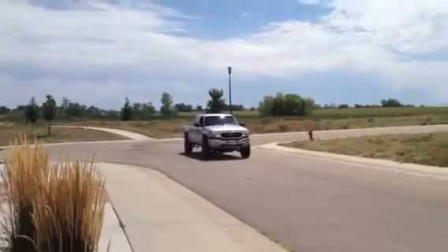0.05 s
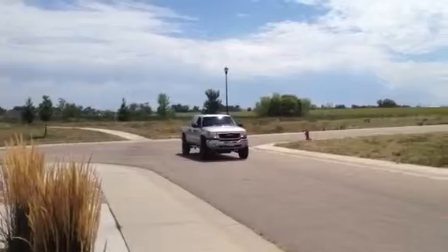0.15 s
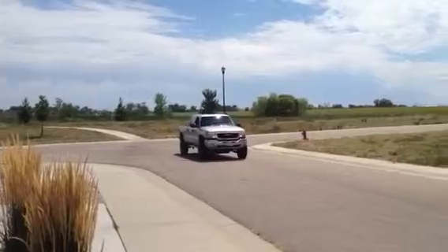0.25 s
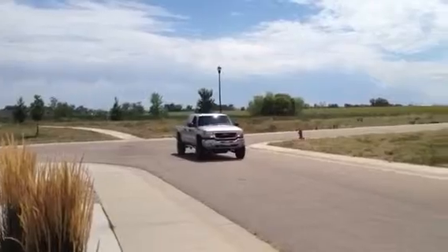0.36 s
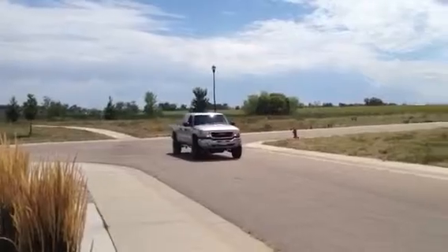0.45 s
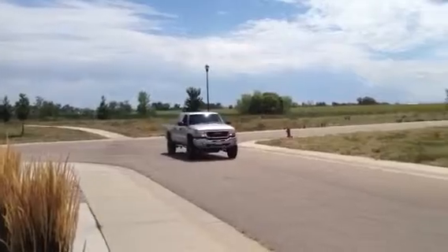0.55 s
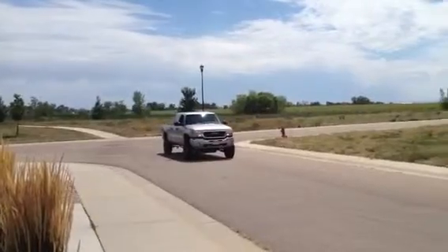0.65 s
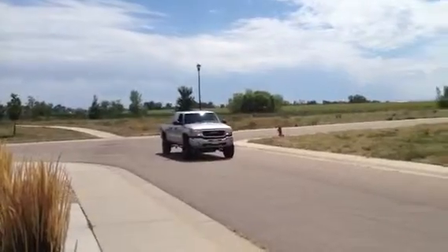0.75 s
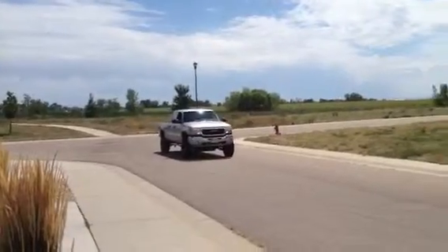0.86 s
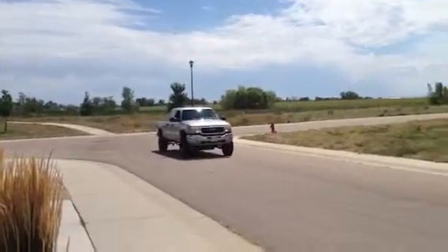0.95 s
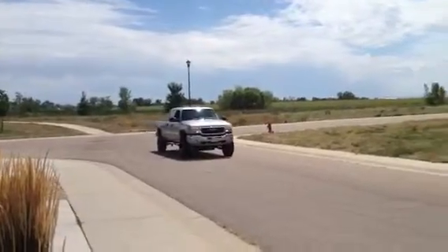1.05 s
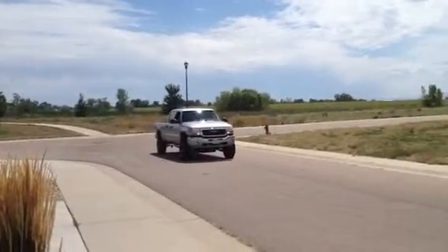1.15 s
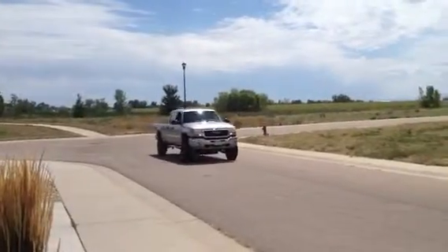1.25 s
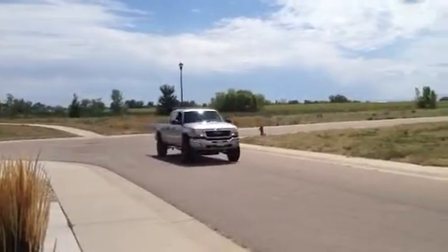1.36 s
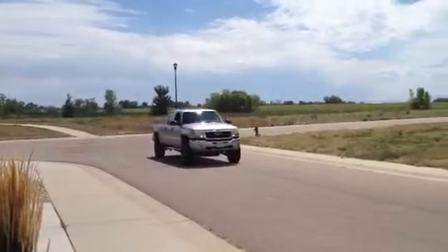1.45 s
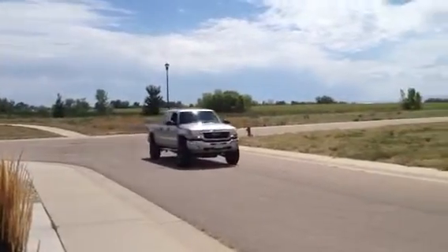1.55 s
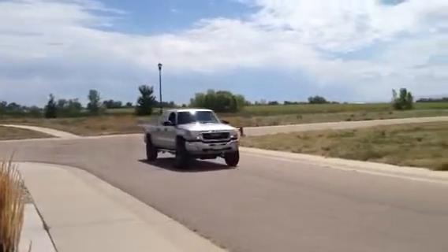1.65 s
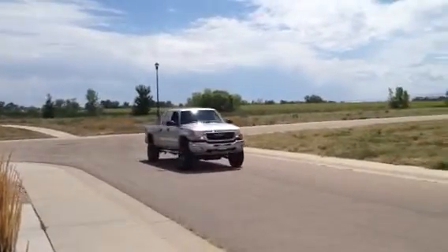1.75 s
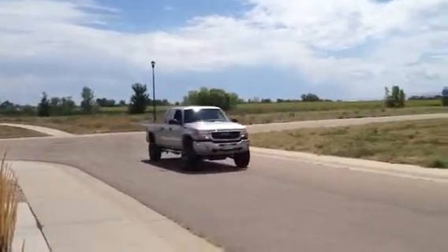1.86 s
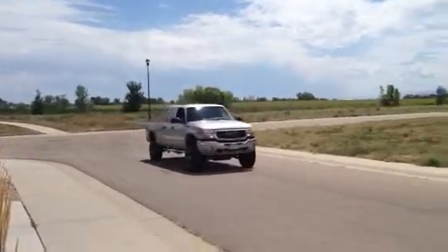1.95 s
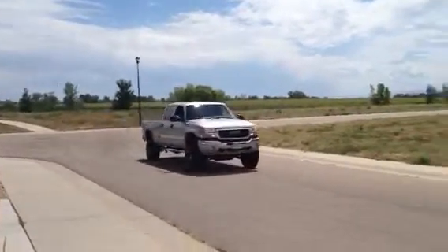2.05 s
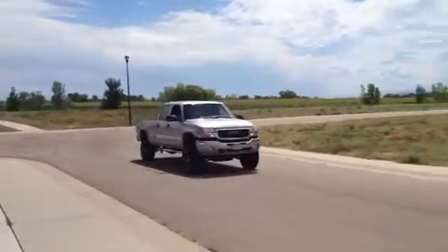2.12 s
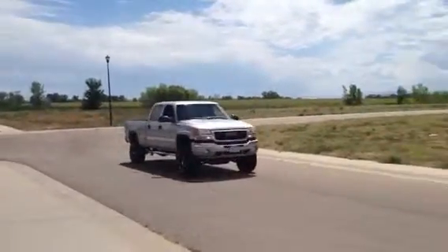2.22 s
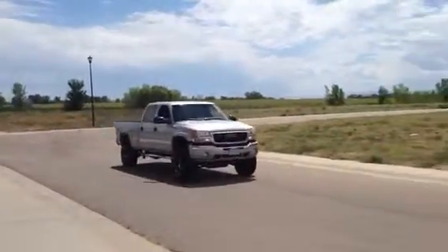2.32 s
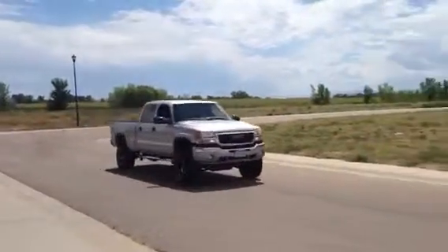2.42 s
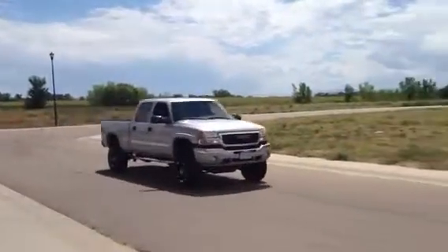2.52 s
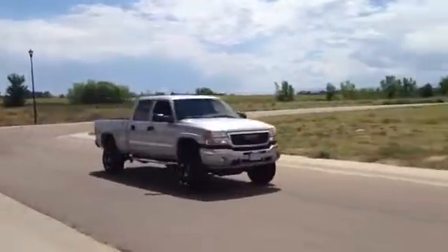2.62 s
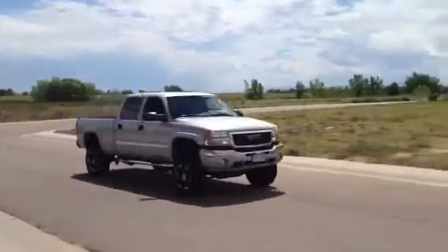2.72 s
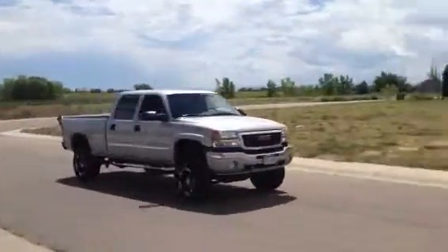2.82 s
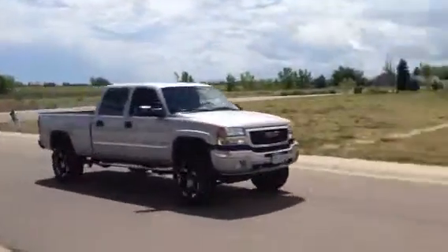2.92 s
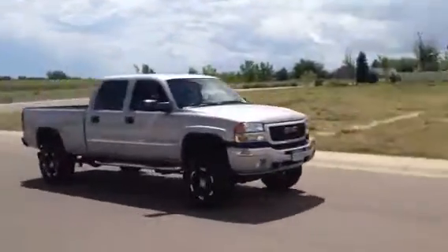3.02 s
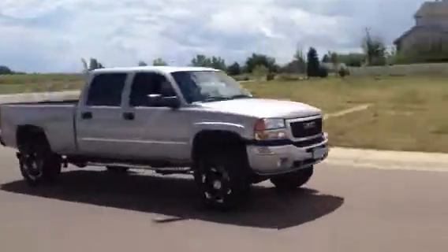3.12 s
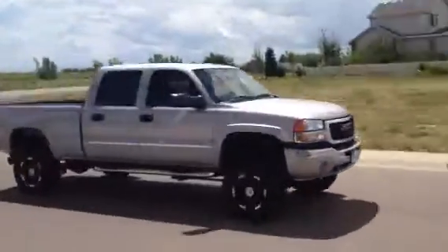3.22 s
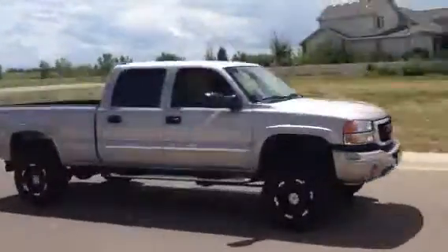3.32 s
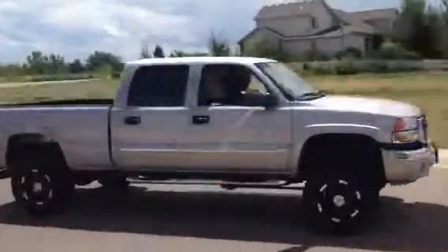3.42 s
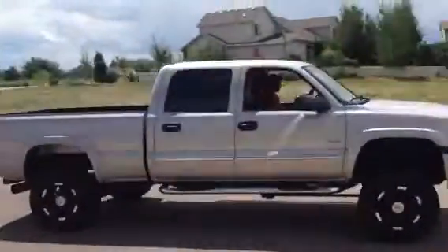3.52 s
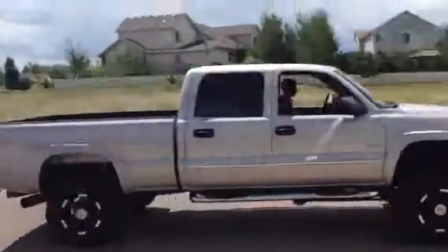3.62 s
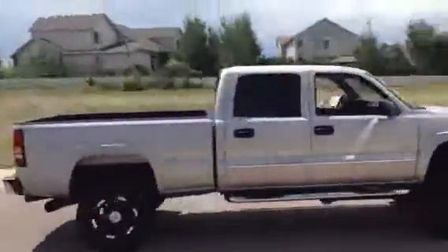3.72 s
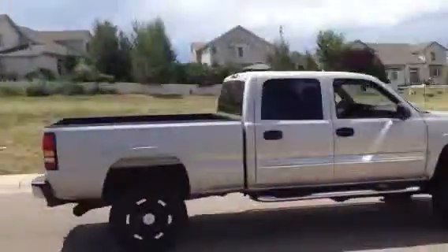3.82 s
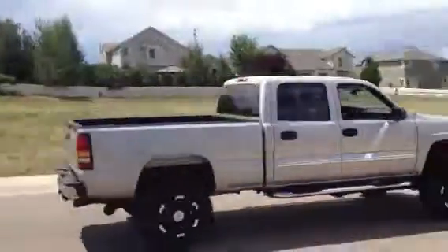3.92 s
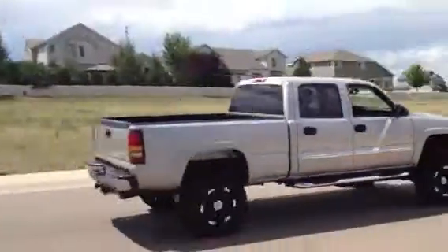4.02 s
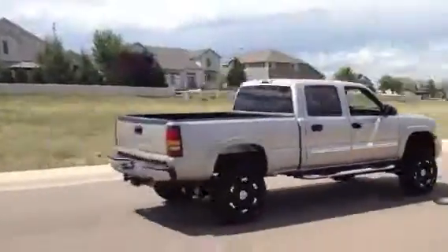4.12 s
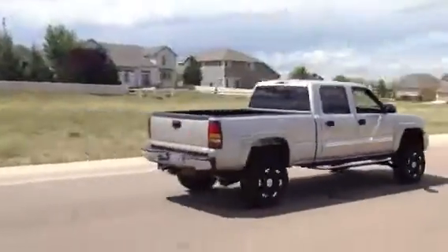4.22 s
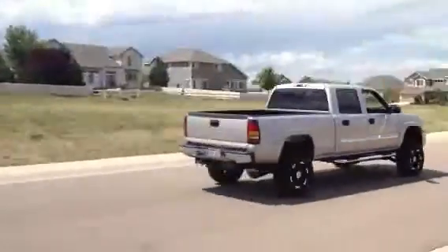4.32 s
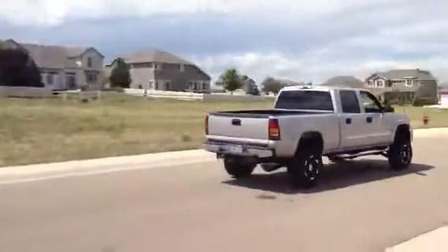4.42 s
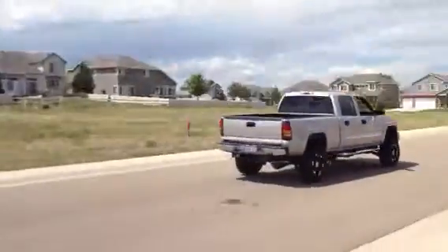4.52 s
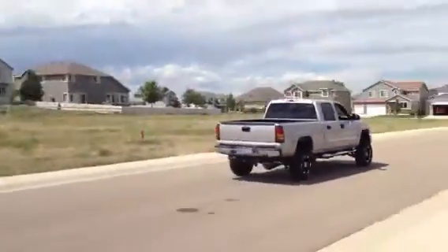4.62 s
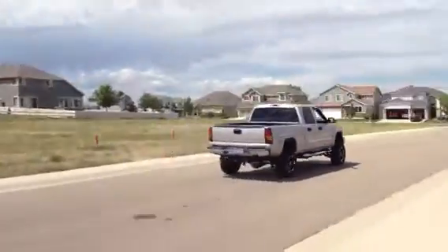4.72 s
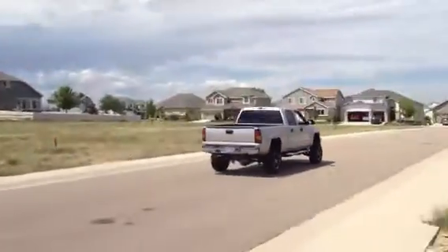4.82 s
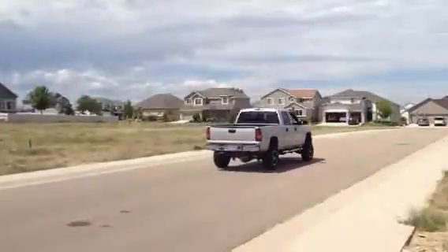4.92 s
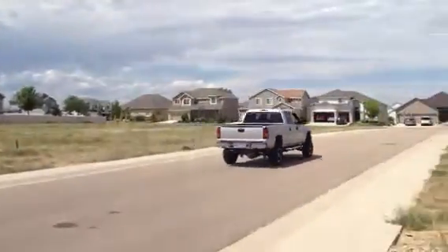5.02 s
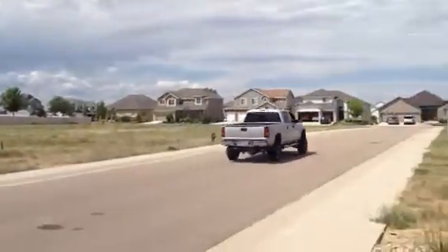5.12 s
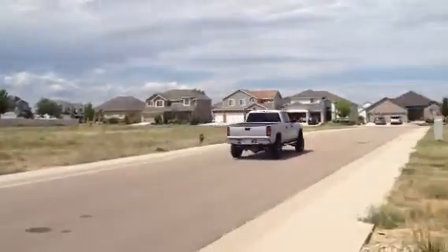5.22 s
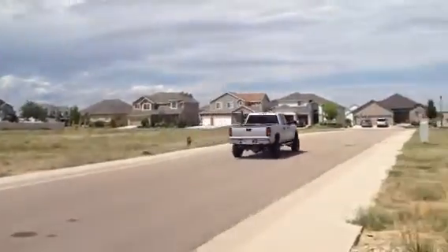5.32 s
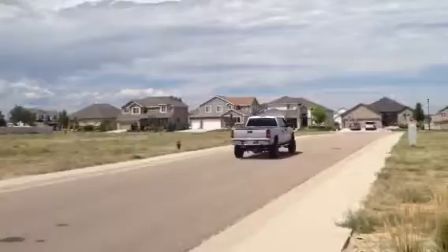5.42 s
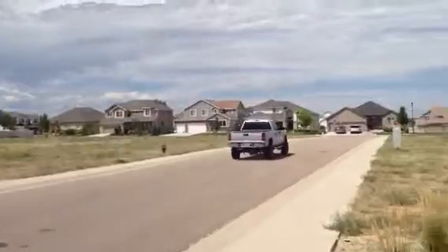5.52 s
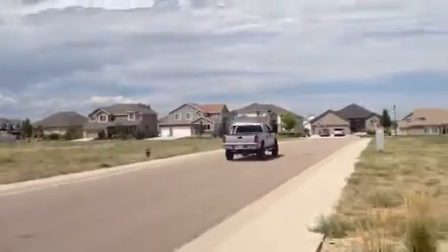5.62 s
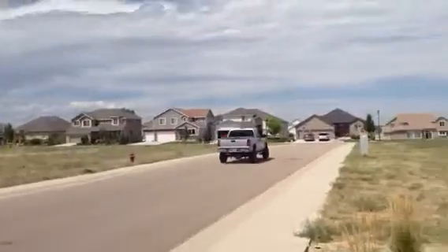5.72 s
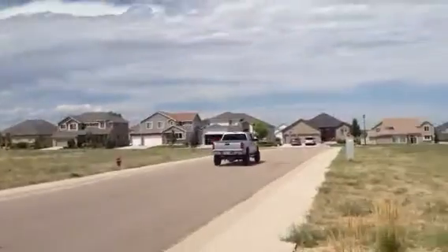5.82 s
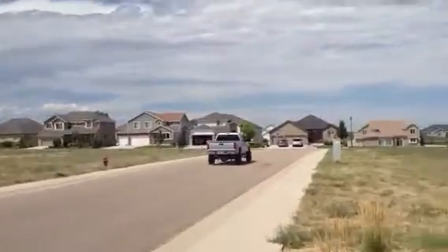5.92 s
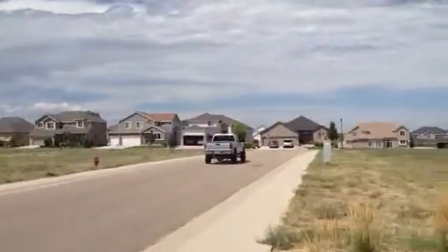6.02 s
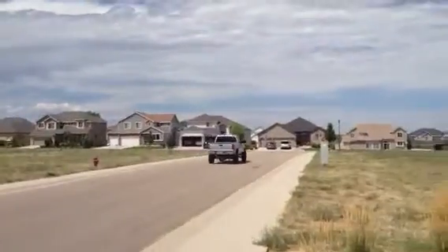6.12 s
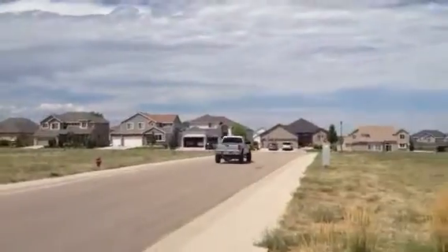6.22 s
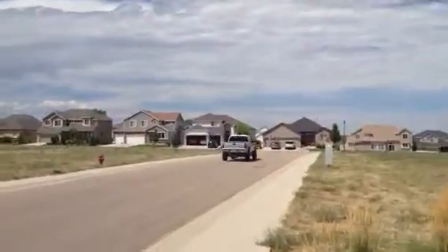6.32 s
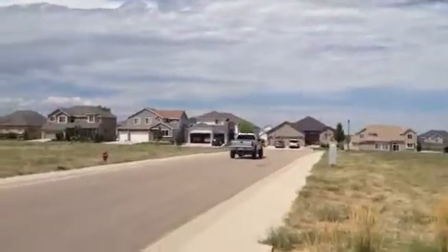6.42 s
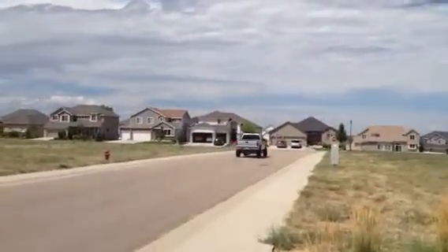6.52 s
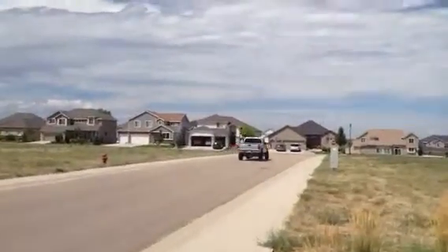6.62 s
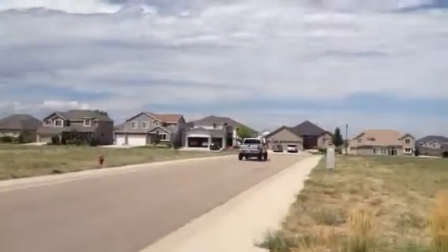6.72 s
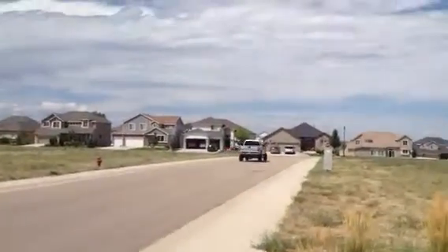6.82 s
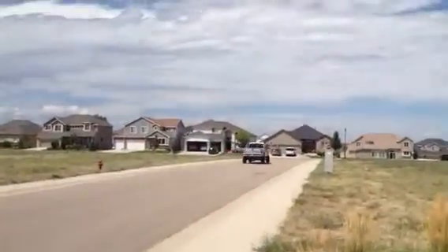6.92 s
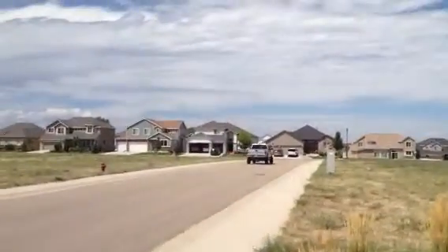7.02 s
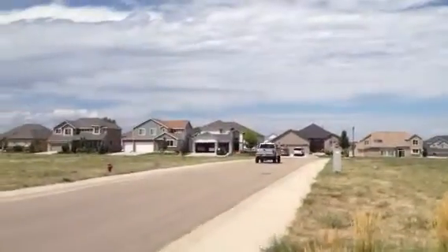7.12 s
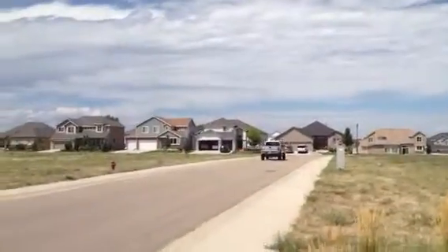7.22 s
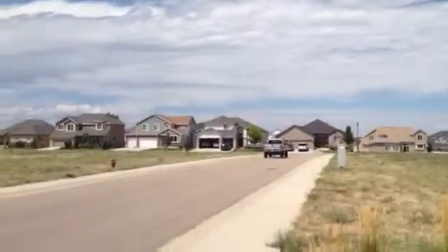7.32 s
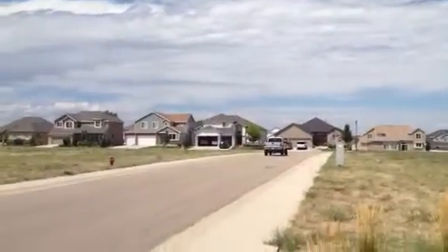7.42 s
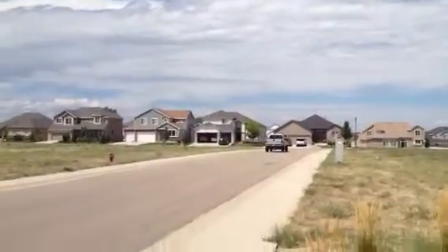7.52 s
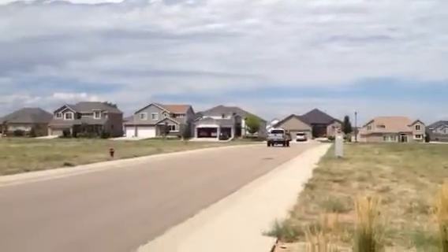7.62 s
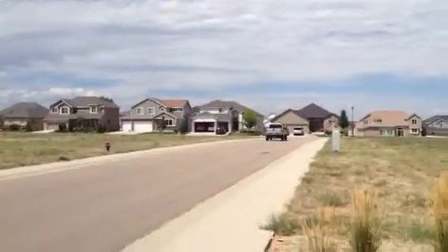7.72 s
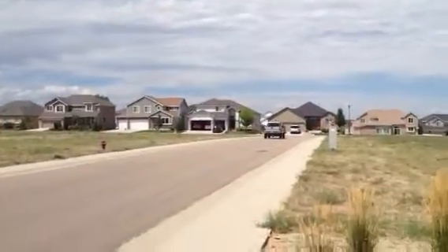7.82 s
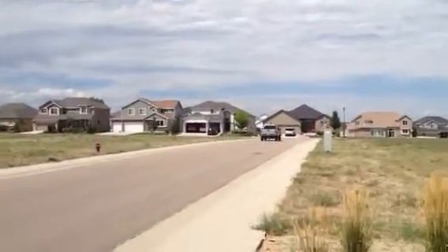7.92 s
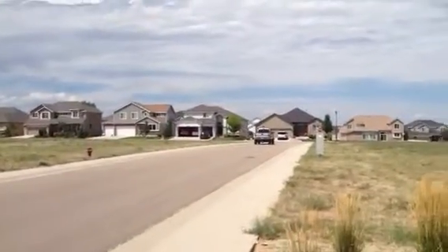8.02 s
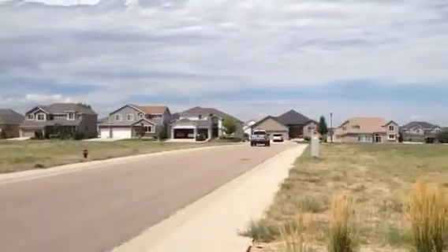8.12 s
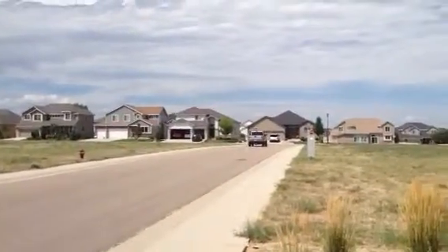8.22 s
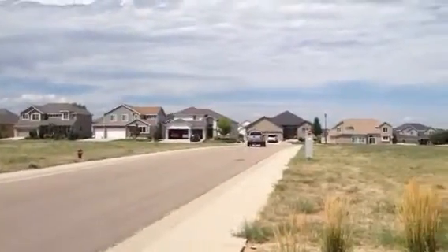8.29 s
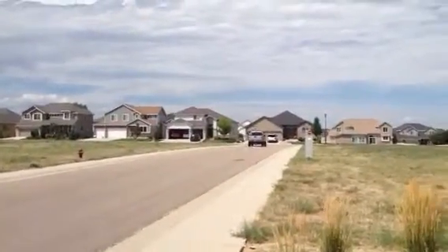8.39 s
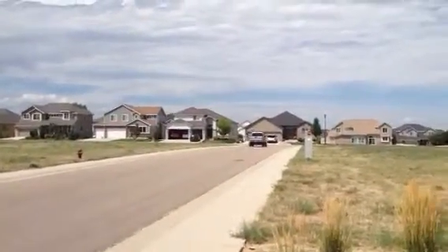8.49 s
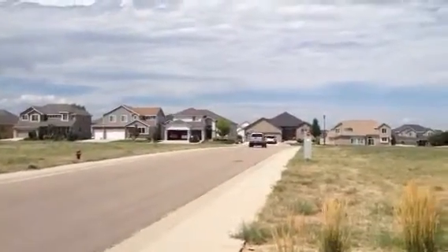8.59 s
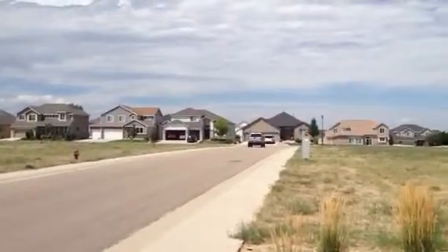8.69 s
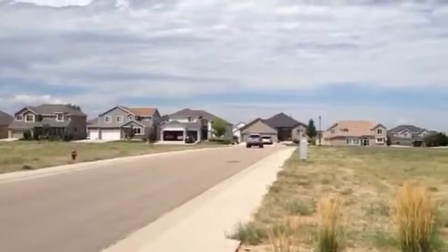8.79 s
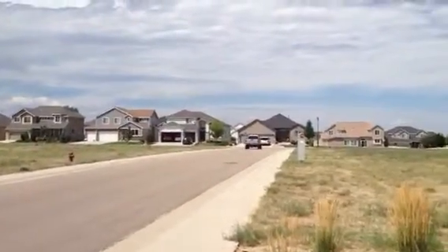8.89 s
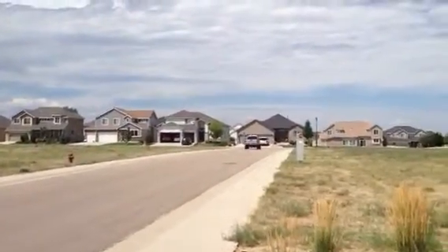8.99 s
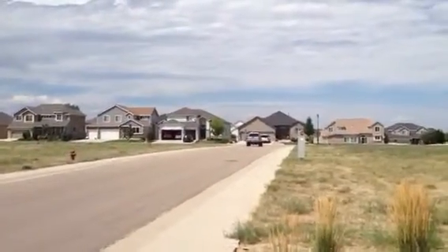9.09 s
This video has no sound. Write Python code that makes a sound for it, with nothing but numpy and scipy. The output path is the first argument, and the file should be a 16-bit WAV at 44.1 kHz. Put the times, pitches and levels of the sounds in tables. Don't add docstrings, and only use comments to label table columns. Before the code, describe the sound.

Quiet diesel clatter and intake hiss swell into a hard, climbing engine growl. The truck passes close, broad and gritty, with tyre and intake noise, its pitch dropping at the pass. From behind comes a throatier, pulsing exhaust until the driver lifts off. The sound drops sharply, winds down and recedes along the open street. Handheld phone, thin in deep bass, slightly distorted at the loudest point.

```python
import sys
import numpy as np
from scipy import signal
from scipy.fft import rfft, irfft, next_fast_len
from scipy.io import wavfile
from scipy.ndimage import uniform_filter1d

SR = 44100
rng = np.random.default_rng(int(sys.argv[2]) if len(sys.argv) > 2 else 0)


def magnitude_from_level(level_db):
    exponent = np.asarray(level_db, float) / 20
    return 10 ** exponent


def dump_mix(stems):
    frames = np.atleast_2d(stems).T
    limited = np.clip(frames, -1, 1)
    pcm = np.round(limited * 32767).astype(np.int16)
    wavfile.write(sys.argv[1], SR, pcm)


N = 403515
T = np.arange(N) / SR

BARK_S = 5.156
LIFT_S = 5.78

# (time [s], [(pitch [Hz], level [dB
# per Hz])], [(pitch [Hz], level [dB per Hz])])
FRONT = [
    (0.501, [(240, -40), (400, -20), (549, 0), (609, -2), (1020, -11.5), (1430, -3), (1790, -7.5), (2090, -17.5), (2440, -5.5), (2700, -28), (3100, -11), (4030, -40), (6820, -120)], [(1820, -49), (3100, -11.5), (3330, -0.5), (4380, 0), (6310, 9.5), (6920, 6), (7800, -15), (9980, -12), (11500, -23), (12800, -15), (14300, -30), (15200, -34)]),
    (1.6, [(240, -30), (400, -11), (535, -8), (593, 3), (646, -5.5), (910, -8.5), (1720, -3.5), (2140, -18), (2460, -9), (2730, -18), (3100, -19), (4030, -38), (6820, -120)], [(1820, -33), (3100, -10), (3400, -9), (4380, -13.5), (6570, -6), (7800, -17), (9030, -13.5), (11500, -16), (15200, -16)]),
]
FLANK = [
    (2.75, [(240, -33), (400, 1.5), (475, -1.5), (540, 2), (729, 0.5), (942, -9), (1230, -1), (1870, -2.5), (2340, -5), (2730, -16.5), (3100, 0), (4030, -18), (6820, -120)], [(1820, -51), (3100, -8), (3230, -5), (3910, -10), (4770, -7), (6570, -7), (7750, -24), (8450, -17.5), (11800, -23), (15200, -27.5)]),
    (3.8, [(240, -1), (400, 11.5), (455, -27), (568, -3.5), (801, -3), (843, 5), (918, -1), (1240, 1.5), (1630, 2), (2600, -2.5), (3100, -6), (4030, -34), (6820, -120)], [(1820, -31), (3100, -4), (4100, -8), (4900, -3.5), (6650, 0), (8120, -7), (9720, -19), (12700, -10), (15200, -13.5)]),
]
TAIL = [
    (5.2, [(240, -59), (400, -25), (459, -22), (583, -10), (975, -21), (1260, -15), (1520, -27), (1950, -16), (2220, -27), (2660, -22), (3100, -63), (4030, -63), (6820, -120)], [(1820, -39), (3100, -9), (3590, 1.5), (4680, -5), (6520, 1.5), (8450, -9), (9780, -21), (11200, -10), (12900, -20), (14300, -10), (15200, -20)]),
    (6.7, [(240, -38), (400, -8.5), (598, -10), (657, -1.5), (926, -5.5), (1080, 5), (1420, -5.5), (1670, -2), (2140, -12.5), (2440, -11), (3100, -24), (4030, -47), (6820, -120)], [(1820, -29.5), (3100, 0.5), (3270, -4.5), (4020, 0.5), (6310, -4), (7800, -9), (10200, -19), (12800, -19), (14100, -19.5), (15200, -32)]),
]
DISTANT = [
    (8.4, [(240, -33), (400, -11), (680, 0), (865, -6), (1010, 1), (1820, -15.5), (1970, -11.5), (2820, -15.5), (3100, -30.5), (4030, -52.5), (6820, -120)], [(1820, -33), (3100, -5), (4840, -5.5), (6520, -7.5), (7250, -9), (10000, -25), (12800, -18.5), (14000, -20), (15200, -12.5)]),
]
ASPECTS = FRONT + FLANK + TAIL + DISTANT
ASPECT_S = [row[0] for row in ASPECTS]


def level(x, db=0):
    return x * magnitude_from_level(db) / np.sqrt(np.mean(x ** 2))


def band(x, lo_hz, hi_hz, order=2):
    return signal.sosfilt(signal.butter(order, [lo_hz, hi_hz], "band", fs=SR, output="sos"), x)


def noise_band(lo_hz, hi_hz, db, order=2):
    return level(band(rng.standard_normal(N), lo_hz, hi_hz, order), db)


def walk(rate):
    knots = rng.standard_normal(int(N * rate / SR) + 2)
    return 1.5 * np.interp(T * rate, np.arange(len(knots)), knots)


def curves(table):
    s, *columns = np.transpose(table)
    return [np.interp(T, s, column) for column in columns]


def by_side(table):
    return [np.interp(T, ASPECT_S, column) for column in np.transpose(table)]


def tone(turns, order, wobble, tied=False):
    shake = wobble + 0.25 * (T > LIFT_S)
    if tied:
        start = -order * turns[int((BARK_S + 0.004) * SR)]
    else:
        start = rng.random()
    size = np.sqrt(2) * (1 + shake * walk(14))
    return size * np.cos(2 * np.pi * (order * turns + start) + shake * walk(14))


def exhaust(turns, throb, firing_db, fifth_db, seventh_db, eighth_db):
    # (multiple of crank turns, level under the exhaust [dB], wobble [0-1])
    minor_orders = [(2.5, -81, 0.6), (3.5, -30, 0.58), (4.5, -17.5, 0.33), (5.5, -24, 0.27),
                    (6, -18.5, 0.45), (6.5, -22.5, 0.29), (7.5, -28, 0.74), (8.5, -41, 0.1), (9, -32, 0.3),
                    (16, -31, 0.7)]
    strong = magnitude_from_level(firing_db) * tone(turns, order=4, wobble=0.08, tied=True)
    strong += magnitude_from_level(fifth_db) * tone(turns, order=5, wobble=0.17, tied=True)
    strong += magnitude_from_level(seventh_db) * tone(turns, order=7, wobble=0.074)
    strong += magnitude_from_level(eighth_db) * tone(turns, order=8, wobble=0.24)
    low_power = magnitude_from_level(2 * firing_db) + magnitude_from_level(2 * fifth_db)
    high_power = magnitude_from_level(2 * seventh_db + 8) + magnitude_from_level(2 * eighth_db + 8)
    effort = np.sqrt(low_power + high_power)
    weak = sum(magnitude_from_level(db) * tone(turns, order, wobble) for order, db, wobble in minor_orders)
    fade = np.clip((7.9 - T) / 0.38, 0, 1)
    return (strong + throb + effort * weak) * fade


def bark(turns, roar_db):
    hidden_db, plain_db = -15.5, -3
    plain_s, rise_s, fall_s = 5.17, 0.47, 0.22
    cycle = np.floor((turns - turns[int(BARK_S * SR)]) / 2)
    fired = np.diff(cycle, prepend=cycle[0]) * magnitude_from_level(1.5 * walk(30))
    puff = np.convolve(fired, np.hanning(int(0.0014 * SR)))[:N]
    ring = band(puff, 450, 900) + magnitude_from_level(-2) * band(puff, 200, 420)
    late = T - plain_s
    facing = np.exp(-(late / np.where(late < 0, rise_s, fall_s)) ** 2)
    return -level(ring) * magnitude_from_level(roar_db + hidden_db + (plain_db - hidden_db) * facing)


def coloured(low, high, ripple_db):
    # pitch [Hz]; the middle two part low, treble and top
    borders_hz = (420, 3100, 8200, 15300)
    treble_from, top_from = borders_hz[1:3]
    size = next_fast_len(N)
    hz = np.maximum(np.fft.rfftfreq(size, 1 / SR), 1)

    def colour(points):
        point_hz, point_db = np.transpose(points)
        return magnitude_from_level(np.interp(np.log(hz), np.log(point_hz), point_db, left=-90))

    panels = np.interp(hz, 45.0 * np.arange(500), rng.standard_normal(500))
    noise = rfft(rng.standard_normal(size)) * magnitude_from_level(ripple_db * panels)
    parts = [
        colour(low) * (hz < treble_from),
        colour(high) * (hz >= treble_from) * (hz < top_from),
        colour(high) * (hz >= top_from),
    ]
    return np.array([level(irfft(noise * part, size)[:N]) for part in parts])


def roar(turns, low_db, treble_db, top_db):
    bands = 0
    for share, (_, low_colour, high_colour) in zip(np.eye(len(ASPECTS)), ASPECTS):
        facing = np.sqrt(np.interp(T, ASPECT_S, share))
        bands = bands + facing * coloured(low_colour, high_colour, ripple_db=2.0)
    low, treble, top = bands
    puff = 1 + 0.16 * np.cos(8 * np.pi * turns) + 0.08 * np.cos(2 * np.pi * turns)
    flutter_db = 0.53 * walk(25)
    out = low * puff * magnitude_from_level(low_db + 0.63 * walk(9))
    out += treble * magnitude_from_level(treble_db + flutter_db) * (0.82 + 0.38 * puff)
    return out + top * magnitude_from_level(top_db + flutter_db)


def gusts():
    # (middle [s], half length [s], level [dB])
    swells = [
        (3.295, 0.19, 1.5),
        (4.213, 0.14, 1),
        (5.562, .04, 2),
        (5.698, 0.023, 4.5),
        (5.829, 0.14, -2.5),
        (6.1, 0.088, 1.5),
        (7.25, .15, 4.5),
        (7.603, 0.36, -5.5),
        (7.92, 0.052, 2),
        (8.548, .1, 3.5),
    ]
    return sum(db * np.exp(-2 * ((T - s) / half) ** 2) for s, half, db in swells)


def road(x):
    # (time [s], first cancelled pitch [Hz], strength [0-1])
    road_echo = [
        (0, 891.4, 0),
        (2.6, 503.4, 0.04),
        (3.5, 424.8, 0),
        (3.85, 410.3, 0.61),
        (4.3, 590, 0.26),
        (4.7, 1002, 0.41),
        (5.5, 1620, 0.04),
        (6.2, 2121, 0.39),
        (9.15, 3230, 0.12),
    ]
    notch_hz, strength = curves(road_echo)
    lower = band(x, 290, 1460, order=1)
    late = np.interp(np.arange(N) - SR / (2 * notch_hz), np.arange(N), lower)
    return (x + strength * late) / np.sqrt(1 + strength ** 2)


def glide(line, spread):
    start, end, from_hz, to_hz, db = line
    out = np.zeros(N)
    span = slice(int(start * SR), int(end * SR))
    along = np.linspace(0, 1, span.stop - span.start)
    hz = from_hz * (to_hz / from_hz) ** along * (1 + spread * walk(900)[span])
    breath = walk(550)[span] if spread else 1.3
    swell = np.abs(np.sin(np.pi * along)) ** 0.7
    out[span] = magnitude_from_level(db) * swell * breath * np.cos(2 * np.pi * np.cumsum(hz) / SR)
    return out


def turbo():
    # (from [s], to [s], from [Hz], to [Hz], loudest level [dB])
    whistles = [
        (.15, 1.45, 11600, 15900, -55),
        (.15, 1.6, 9800, 13900, -57),
        (6.22, 6.85, 15400, 11300, -69),
        (7.25, 8.2, 9100, 6500, -78),
        (6.22, 6.55, 10000, 5200, -62),
        (6.3, 6.55, 7000, 4700, -66),
        (2.55, 3.1, 3120, 3380, -35),
        (0, 2.3, 3380, 3400, -49),
        (6.35, 6.7, 2950, 2850, -55),
        (8.4, 8.62, 4500, 4500, -71),
    ]
    # (from [s], to [s], from [Hz], to [Hz], level [dB])
    belt_whine = (.1, 0.5, 886.5, 994, -49)
    return sum(glide(line, spread=0.007) for line in whistles) + glide(belt_whine, spread=0)


def rumble():
    return noise_band(131, 310, -13.5, order=3) + noise_band(86, 185, -30.5)


def background():
    mic_hiss = noise_band(11560, 15960, -78.5, order=1)
    district = noise_band(75, 220, -65)
    return mic_hiss + district


def scene():
    # (time [s], crank turns [Hz])
    crank_speed = [(0, 29.25), (1.16, 33.4), (1.61, 36.9), (2.05, 41.34), (2.44, 46.53), (2.96, 54.74),
                   (3.29, 45.33), (3.8, 44.42), (4.77, 46.12), (4.92, 44.7), (5.3, 44.46), (5.66, 47.33),
                   (5.8, 44.37), (6.1, 43.7), (6.27, 40.17), (6.42, 34.55), (7.35, 26.74), (7.8, 22.54)]
    # (time [s], level [dB])
    roar_level = [(0, -37.5), (.5, -36), (1.65, -33), (2.1, -28.5), (2.75, -22), (3.03, -24.5),
                  (3.39, -21.5), (3.5, -23.5), (3.9, -21), (4.35, -26), (5.05, -25), (5.772, -29),
                  (5.782, -27.5), (6.14, -36.5), (6.75, -44), (7.2, -45.5), (7.5, -49.5), (9.15, -56.5)]
    # (time [s], firing tone [dB], fifth order [dB], eighth order [dB])
    exhaust_effort = [(0, -38, -49, -38), (.6, -40, -42.5, -45.5), (1.16, -36, -37.5, -36),
                      (1.6, -27.5, -31.5, -36), (2.4, -24.5, -17.5, -34), (2.62, -16, -18, -31),
                      (2.9, -10, -27, -47), (3.17, -13.5, -28, -40), (3.4, -13, -18.5, -27),
                      (3.95, -17, -15.5, -48.5), (4.3, -12.5, -18, -31.5), (4.77, -18, -27, -33),
                      (5.0, -13.5, -24.5, -32.5), (5.22, -21.5, -27, -33), (5.4, -16, -31, -36),
                      (5.775, -20, -34.5, -48), (5.79, -34.5, -41.5, -53.5), (7.7, -64, -57, -64)]
    # (treble [dB], top [dB], rumble [dB])
    side_noise = [
        (-10.5, -17.5, 10.5),
        (-9, -12.5, 12),
        (-6, -12.5, 7.5),
        (-10, -11.5, 5),
        (-15.5, -23.5, 2),
        (-16.5, -27.5, 7),
        (-16.5, -31, 7.5),
    ]
    # (second [dB], third [dB], seventh [dB])
    side_orders = [
        (-45, -36, -1.5),
        (-40, -22, -4.5),
        (-27, -5.5, -10.5),
        (-31, -12, -20),
        (-31, -9, -19),
        (-19, -15, -11),
        (-42, -20, -11),
    ]
    crank_hz, = curves(crank_speed)
    turns = np.cumsum(crank_hz) / SR
    roar_db, = curves(roar_level)
    treble_db, top_db, rumble_db = roar_db + by_side(side_noise)
    swings_db = [1 * walk(9) for _ in range(3)]
    second_db, third_db, seventh_db = roar_db + by_side(side_orders) + swings_db
    seventh_db += -4 * (T > LIFT_S)
    firing_db, fifth_db, eighth_db = curves(exhaust_effort)

    throb = magnitude_from_level(second_db) * tone(turns, order=2, wobble=0.13)
    throb += magnitude_from_level(third_db) * tone(turns, order=3, wobble=0.11)
    gust_db = gusts()
    body = roar(turns, roar_db, treble_db + gust_db, top_db + gust_db)
    truck = exhaust(turns, throb, firing_db, fifth_db, seventh_db, eighth_db)
    truck += road(body) + bark(turns, roar_db)
    return (truck + magnitude_from_level(rumble_db) * rumble() + turbo() + background())[None]


def thumps():
    # (time [s], level [dB])
    flattened_peaks = [(2.763, -44), (2.884, -46), (3.334, -42), (3.379, -44), (3.424, -53), (3.517, -52),
                       (3.599, -48), (3.689, -43), (3.824, -52), (4.049, -47), (4.229, -52), (4.274, -45),
                       (4.318, -40)]
    out = np.zeros(N)
    for s, db in flattened_peaks:
        out[int(s * SR)] = -magnitude_from_level(db + 10)
    return np.convolve(out, np.hanning(int(0.008 * SR)))[:N]


def top_cut(x):
    return signal.sosfilt(signal.butter(12, 15310, fs=SR, output="sos"), x)


def record(dry):
    cut = signal.sosfilt(signal.butter(4, 80, "high", fs=SR, output="sos"), dry)
    bent = np.tanh(0.8 * cut) / 0.79 - 0.0076 * cut ** 2
    bent = signal.sosfilt(signal.butter(1, 12, "high", fs=SR, output="sos"), bent)
    loudness = uniform_filter1d(np.abs(cut) ** 0.8, size=4000)
    drift = magnitude_from_level(-30) * band(rng.standard_normal(N), 15, 60, order=1) * loudness
    return top_cut(bent + drift + thumps())


dry = scene()
out = record(dry)
dump_mix(out)
```